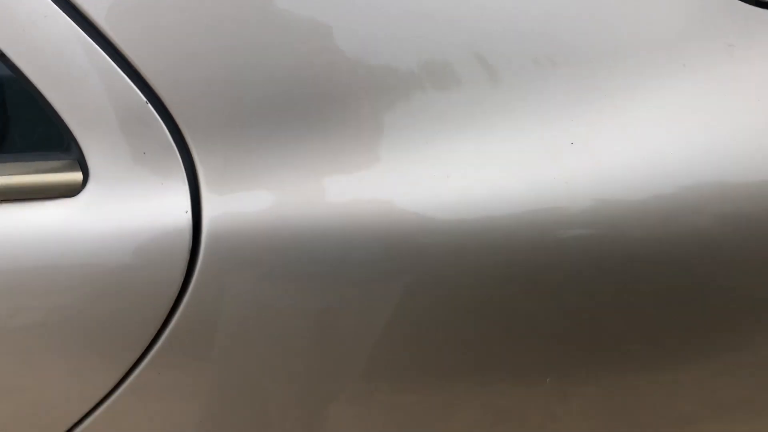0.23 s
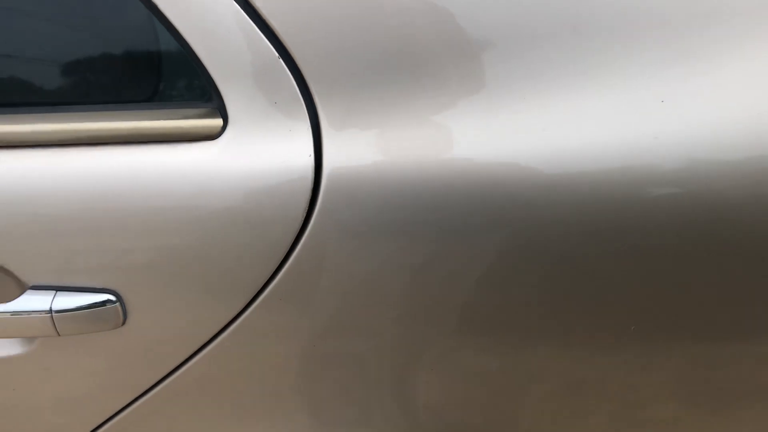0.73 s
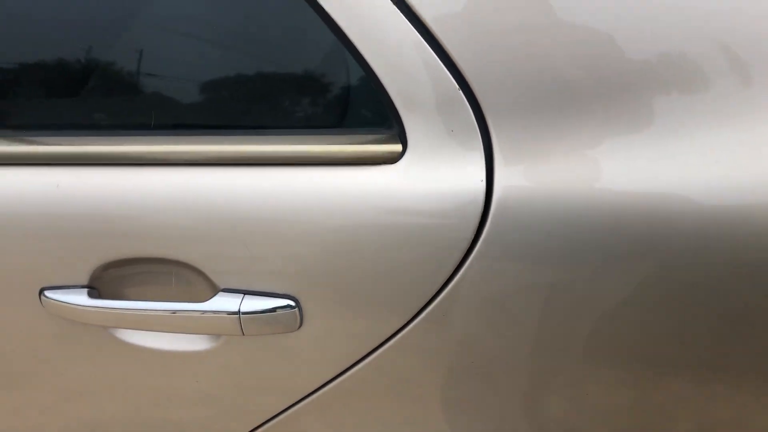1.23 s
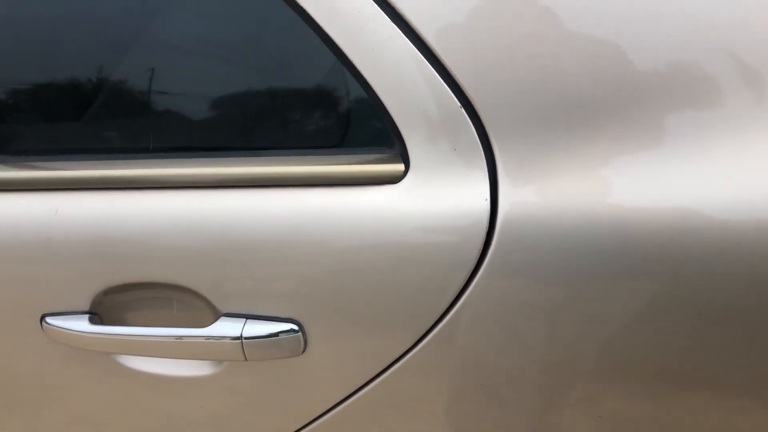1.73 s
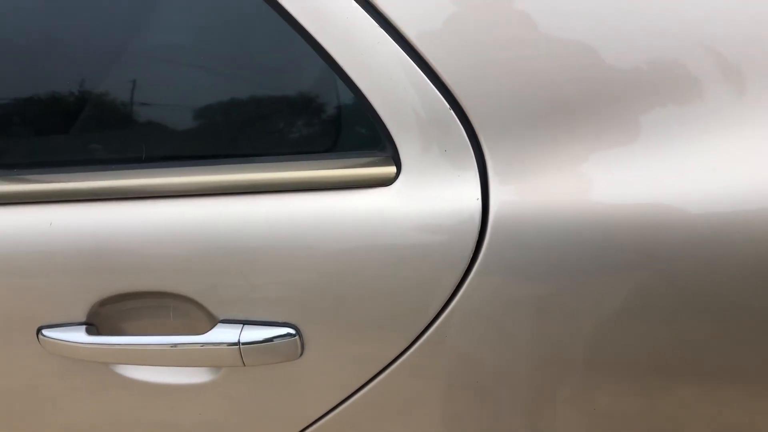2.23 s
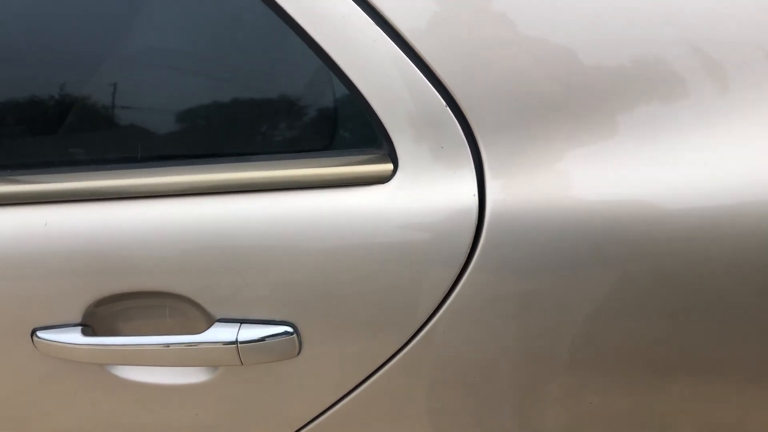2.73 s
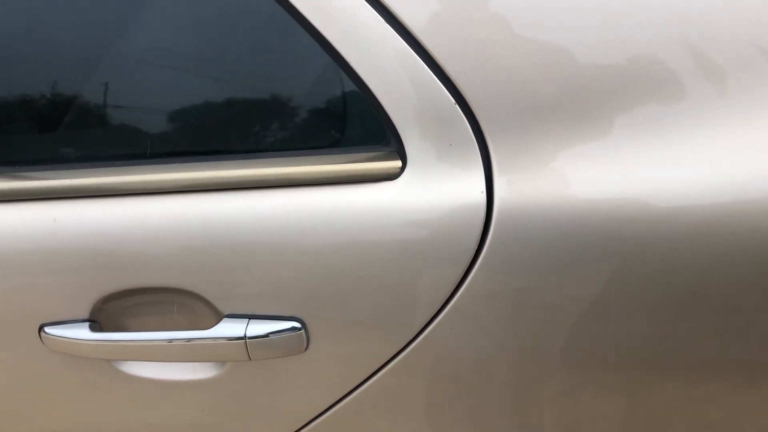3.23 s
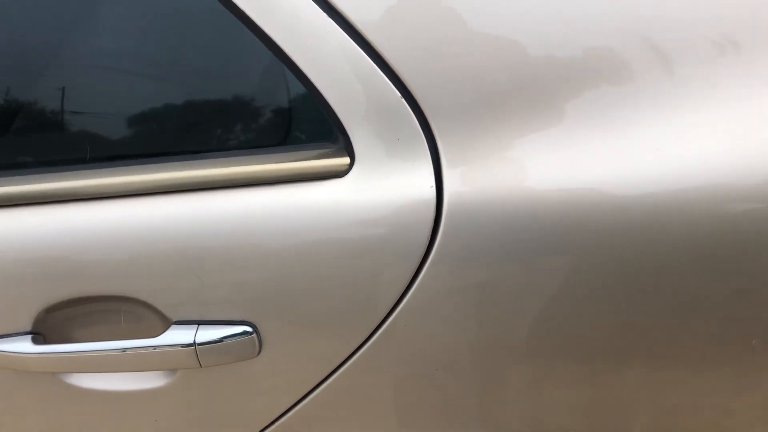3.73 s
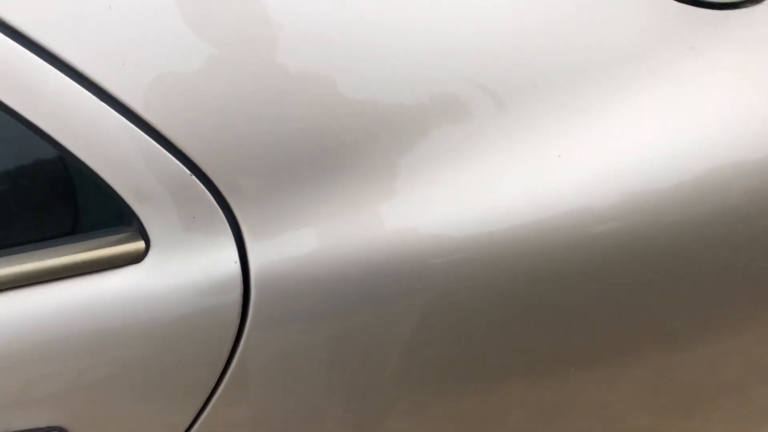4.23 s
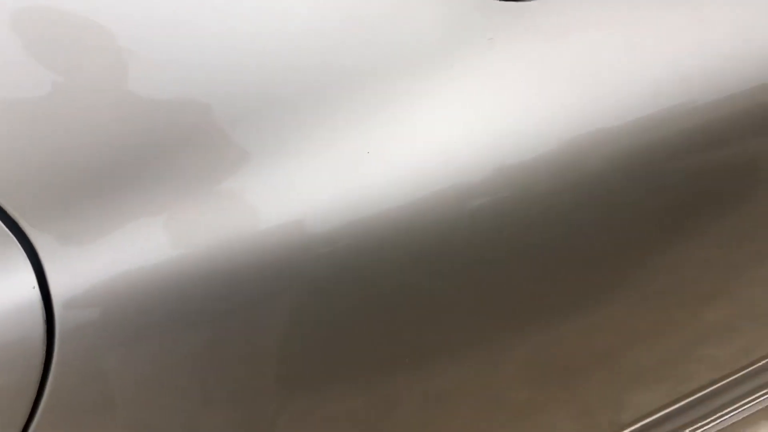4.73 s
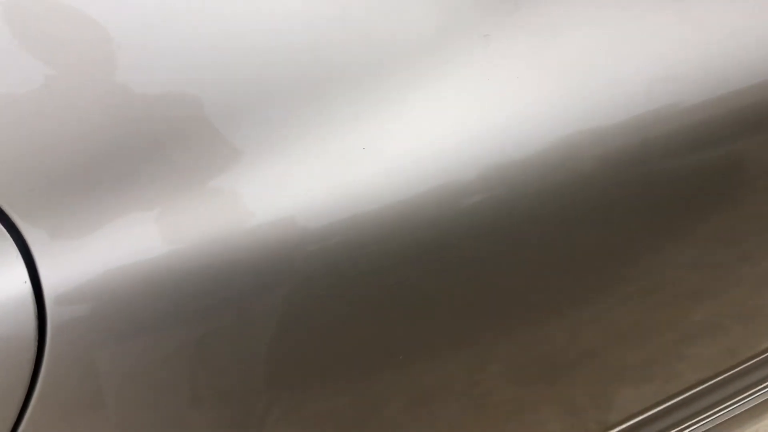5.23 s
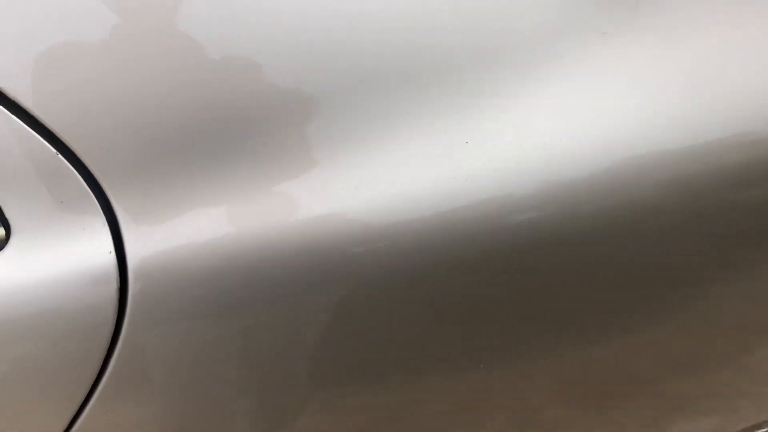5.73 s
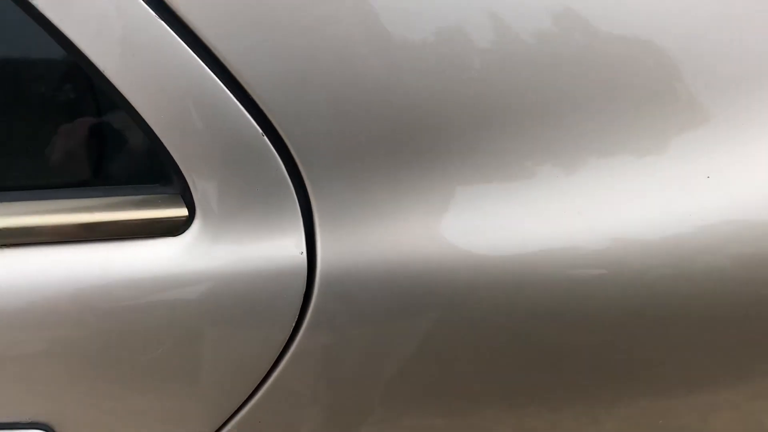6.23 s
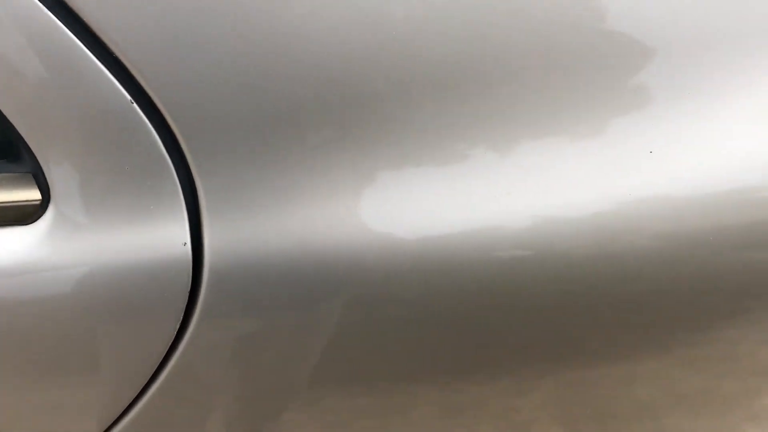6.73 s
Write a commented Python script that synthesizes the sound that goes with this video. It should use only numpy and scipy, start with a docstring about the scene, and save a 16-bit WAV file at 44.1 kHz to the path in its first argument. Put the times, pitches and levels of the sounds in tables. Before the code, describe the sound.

Outdoors, a thin jingle of keys and a rustle of fabric lead into uneven footwork on gravel, heard close up. Stones knock and scrape, and grit gives sharp little snaps. Late on comes a single dull thump on a car's body, the loudest sound. Low, faraway traffic lies underneath, with one passing vehicle's hum, very faint insects and one barely audible bird whistle.

```python
"""Beside a parked car, someone steps and shuffles on gritty ground, close to the microphone.
Stones grind, knock and scrape under the shoes, grit snaps, clothing brushes and keys jingle at the start.
Late on, a car panel takes one dull blow and rings briefly. Behind it all, distant traffic rumbles,
one vehicle hums past with falling pitch, insects hiss faintly and a far bird whistles once."""
import sys
import numpy as np
from scipy import signal
from scipy.fft import rfft, irfft, next_fast_len
from scipy.io import wavfile
from scipy.ndimage import map_coordinates

SR = 44100
rng = np.random.default_rng(int(sys.argv[2]) if len(sys.argv) > 2 else 0)


def to_wav(s):
    """Save 16-bit WAV."""
    ch = np.atleast_2d(s).T  # columns
    pcm = np.round(np.clip(ch, -1, 1) * 32767)  # PCM
    wavfile.write(sys.argv[1], SR, pcm.astype(np.int16))


N = 308259
TIME = np.arange(N) / SR


def amp(db):
    """Decibels to gain."""
    return 10 ** (np.asarray(db) / 20)


def unit(x):
    """Scale to rms 1."""
    return x / np.sqrt(np.mean(x ** 2) + 1e-20)


def curves(rows):
    """Automation: one value per sample for each column after the time."""
    times, *columns = np.transpose(rows)
    return [np.interp(TIME, times, column) for column in columns]


def swells(rows):
    """A gain envelope of bell-shaped strokes."""
    return sum(amp(db) * np.exp(-((TIME - middle) / half) ** 2) for middle, half, db in rows)


def wobble(rate):
    """Smooth random modulation, rate knots a second."""
    knots = rng.standard_normal(int(N * rate / SR) + 4)
    return map_coordinates(knots, [np.arange(N) * rate / SR])


def filtered(x, response):
    """Pass x through a complex frequency response."""
    size = next_fast_len(len(x) + 2048)
    return irfft(rfft(x, size) * response(np.fft.rfftfreq(size, 1 / SR)), size)[:len(x)]


def coloured(x, spectrum):
    """EQ x through (f/Hz, level/dB) points and scale it to rms 1."""
    hz, db = np.transpose(spectrum)
    return unit(filtered(x, lambda f: amp(np.interp(np.log(f + 1), np.log(hz), db))))


def resonance(f, hz, q):
    """Response of one damped mode."""
    return 1j * f * hz / q / (hz * hz - f * f + 1j * f * hz / q)


def highpass(f, hz):
    """Response of a second-order low cut."""
    return -f * f / (hz * hz - f * f + 1j * f * hz * np.sqrt(2))


def band_limit(f, top_hz=16200):
    """Response of a steep, smooth-edged high cut."""
    return 1 / np.sqrt(1 + (f / top_hz) ** 120)


def band(x, hz, q):
    """A narrow band of x, at rms 1."""
    return unit(filtered(x, lambda f: resonance(f, hz, q) ** 2))


def add(track, s, sound):
    """Mix a sound into the track at s seconds."""
    i = max(round(s * SR), 0)
    track[i:i + len(sound)] += sound[:N - i]


def ringing(modes, t, scatter_db):
    """Decaying modes, at slightly new strengths for every hit."""
    return sum(amp(db + scatter_db * rng.standard_normal() - 60 * t / t60) * np.sin(2 * np.pi * hz * t)
               for hz, db, t60 in modes)


def distant_tone(glide, partials, blur, blur_hz):
    """A gliding tone with (multiple, gain/dB) partials; scattered paths blur each into a narrow band."""
    hz, db = curves(glide)
    phase = 2 * np.pi * np.cumsum(hz) / SR
    gate = (TIME >= glide[0][0]) & (TIME <= glide[-1][0])
    out = np.zeros(N)
    for multiple, gain_db in partials:
        paths = 1 + blur * (wobble(blur_hz) + 1j * wobble(blur_hz))
        out += amp(db + gain_db) * np.imag(paths * np.exp(1j * multiple * phase))
    return gate * out


def traffic():
    """The bed: distant traffic rumble drifts in level under a steady hiss of air."""
    # outdoor noise colour: f/Hz, relative level/dB
    air_eq = [(20, -37), (35, -12.5), (55, -4), (90, 3), (150, -4), (250, -12), (500, -20.5), (1000, -26.5),
              (2000, -34), (5000, -38), (9000, -43.5), (10800, -45), (16000, -42.5)]
    # fader ride on the rumble: t/s, level/dB
    rumble_ride = [(0, -55), (2.3, -55), (4.2, -56), (5.3, -58), (5.75, -55), (7, -57.5)]
    air = coloured(rng.standard_normal(N), air_eq)
    rumble = filtered(air, lambda f: 1 / (1 + (f / 900) ** 2))
    hiss = air - rumble
    return amp(curves(rumble_ride)[0]) * rumble + amp(-56.5) * hiss


def insects():
    """Far insects merge into two high bands: a thin, steady one and a wider one that swells late."""
    # the late swell: middle t/s, half-length/s, level/dB
    shrills = [(6.92, 0.29, -77)]
    steady = amp(-87) * band(rng.standard_normal(N), hz=9900, q=11)
    return steady + swells(shrills) * band(rng.standard_normal(N), hz=8350, q=2.5)


def bird():
    """One far whistle lifts and falls, blurred on its way."""
    # the whistle: t/s, f/Hz, level/dB
    glide = [(3.14, 3000, -98), (3.24, 3160, -82), (3.36, 2880, -81.5), (3.6, 2790, -79)]
    return distant_tone(glide, [(1, 0)], blur=0.99, blur_hz=216)


def vehicle():
    """A vehicle's hum falls in pitch as it passes."""
    # the hum: t/s, f/Hz, level/dB before the partials' gains
    glide = [(5.4, 242.2, -90), (5.68, 238, -65), (5.95, 231, -58.5), (6.15, 221.2, -61.5),
             (6.3, 209.3, -57), (6.5, 198.4, -60), (6.7, 189, -59.5), (7, 181, -63.5)]
    return distant_tone(glide, [(1, 4), (2, -16.0)], blur=0.31, blur_hz=29.4)


def clothing():
    """Fabric slides over fabric in soft, slightly scratchy swells."""
    # sweeps of clothing: middle t/s, half-length/s, level/dB
    brushes = [(.03, 0.094, -53), (.49, 0.23, -53), (1.08, .15, -52.5), (4.35, 0.3, -66.5)]
    # fabric colour: f/Hz, relative level/dB
    cloth_eq = [(250, -4), (500, -1.5), (850, 4.5), (1500, 3), (3000, 2), (6000, -3), (12000, -9),
                (16000, -9.5)]
    scratch = amp(1.54 * wobble(66) + 1.3 * wobble(700))
    return swells(brushes) * scratch * coloured(rng.standard_normal(N), cloth_eq)


def keys():
    """Small metal, like keys, gives a brief, thin jingle; every touch favours other modes."""
    # touches: t/s, level/dB
    jingles = [(.032, -53), (0.066, -50), (0.102, -40), (.117, -44), (.135, -55)]
    # modes of the metal: f/Hz, relative level/dB, t60/s
    modes = [(2880, -10, 0.074), (4650, -18.5, 0.1), (6230, -12, 0.036), (9460, 2.5, 0.044),
             (12500, -7, 0.066)]
    out, t = np.zeros(N), np.arange(SR // 2) / SR
    for s, db in jingles:
        add(out, s, amp(db) * ringing(modes, t, scatter_db=1.5))
    return out * amp(1.5 * wobble(245))


def panel():
    """Soft rubs and a cushioned blow on the car: high modes speak first, heavy low ones build later."""
    # the blow: t/s, level/dB
    blows = [(6.0185, -25.5)]
    # modes of the panel and the cavity behind it: f/Hz, relative level/dB, t60/s
    modes = [(120.3, -3.5, 0.17), (259.3, 4, 0.13), (319.5, -5.5, 0.17), (376, -14, 0.21), (443, -13, 0.21),
             (497, -7.5, 0.16), (632, -20.5, 0.24), (748, -16, .13), (820, -14, 0.17), (920, -23, 0.16),
             (1072, -1.5, 0.044), (1210, -15, 0.084), (1960, -6.5, 0.042), (2140, -10, 0.034)]
    # colour of the blow's rattle: f/Hz, relative level/dB
    thud_eq = [(50, -33), (100, 0.5), (300, -17), (520, -8), (1100, -11), (1400, -16), (2100, -18.5),
               (4000, -25), (16000, -36.5)]
    # rubs around the blow: middle t/s, half-length/s, level/dB
    rubs = [(5.71, 0.083, -58.5), (5.825, 0.016, -51), (5.9, 0.023, -47.5), (6.09, 0.21, -59)]
    # colour of the rubs: f/Hz, relative level/dB
    rub_eq = [(100, 3), (250, 4), (550, -3.5), (900, -10), (1600, -12.5), (4000, -38)]
    out, t = np.zeros(N), np.arange(SR // 2) / SR
    for s, db in blows:
        ring = np.zeros(len(t))
        for k, mode in enumerate(modes):
            attack = 1 - np.exp(-(t * mode[0] / 1.76) ** 2)  # opens over about two cycles
            ring += (-1) ** k * ringing([mode], t, scatter_db=0.5) * attack
        burst = amp(-60 * t / 0.19) * (1 - np.exp(-t / 0.0016))
        rattle = coloured(rng.standard_normal(len(t)), thud_eq) * burst
        add(out, s, amp(db) * ring)
        add(out, s - 0.002, amp(db - 6.5) * rattle)
    return out + swells(rubs) * coloured(rng.standard_normal(N), rub_eq)


def scrapes():
    """A dragged pebble judders and rings at its own pitch for a moment."""
    # drags: middle t/s, level/dB, f/Hz
    drags = [(.875, -47, 4430), (1.762, -51.5, 3940), (2.359, -59, 4250), (3.68, -55.5, 4250)]
    judder = unit(rng.standard_normal(N) * amp(9.2 * wobble(200)))
    return sum(swells([(s, 0.033, db)]) * band(judder, hz, q=5) for s, db, hz in drags)


def contact(body_db, hz, crack_db, chatter_t60, chatter, q, broad, broad_hz, low_cut_hz):
    """A spike and a chatter of micro-slips ring a stone and give off a bright crack, mixed half each."""
    t = np.arange(SR // 25) / SR
    force = chatter * rng.standard_normal(len(t)) * rng.exponential(size=len(t))
    force *= amp(-60 * t / chatter_t60)
    force[0] += 1
    overtone_hz = hz * rng.uniform(1.3, 1.6)
    modes = lambda f: resonance(f, hz, q) + 0.11 * resonance(f, overtone_hz, q)
    stone = lambda f: modes(f) + broad * resonance(f, broad_hz, 0.53)
    # small things radiate little bass
    body = filtered(force, lambda f: stone(f) * highpass(f, low_cut_hz) * resonance(f, 2500, 0.61))
    crack = filtered(force, lambda f: highpass(f, 5700) ** 2 * resonance(f, 9500, 0.85) * band_limit(f))
    return (amp(body_db) * unit(body) + amp(crack_db) * unit(crack)) / 2


def snaps():
    """A faint tick leads into each sharp snap of grit."""
    # dry snaps: t/s, body drive/dB, f/Hz, crack drive/dB
    breaks = [(1.4247, -51, 2270, -72), (2.5032, -62.5, 2310, -70), (2.7638, -58.5, 1410, -85),
              (2.8591, -43.5, 2190, -49.5), (3.096, -43.5, 2280, -44.5), (3.275, -63.5, 1460, -85),
              (3.3212, -48.5, 3080, -52.5), (3.5252, -46.5, 2330, -50), (4.3641, -44, 1800, -40.5),
              (4.8225, -37.5, 5200, -35), (5.0495, -41, 5400, -43.5), (5.2237, -35.5, 4900, -30.5),
              (5.296, -43.5, 4800, -40.5), (5.4457, -50.5, 4350, -57)]
    lead_s, lead_gain_db = 0.011, -22.5
    out = np.zeros(N)
    for s, body_db, hz, crack_db in breaks:
        snap = contact(body_db, hz, crack_db, chatter_t60=0.004, chatter=0.14,
                       q=4.5, broad=0.47, broad_hz=2050, low_cut_hz=880)
        lead_tick = contact(body_db, 2860, crack_db - 9, chatter_t60=0.046, chatter=0.35,
                            q=5, broad=0.3, broad_hz=3200, low_cut_hz=1500)
        add(out, s, snap)
        add(out, s - lead_s, amp(lead_gain_db) * lead_tick)
    return out


def stones():
    """Pebbles slip and knock against each other, each with its own pitch."""
    # the loudest knocks: t/s, body drive/dB, f/Hz, crack drive/dB, chatter t60/s
    knocks = [(0.0268, -43.5, 2770, -48, 0.043), (0.049, -35.5, 2800, -34, 0.038),
              (0.2854, -42.5, 4550, -44, .024), (0.309, -46, 2340, -50.5, 0.041),
              (0.3618, -46, 5900, -46.5, 0.05), (0.8692, -41.5, 4600, -49, 0.0069),
              (0.9382, -46, 3120, -62, 0.01), (0.96, -45.5, 3130, -43.5, 0.029),
              (1.1366, -43.5, 3450, -39.5, 0.034), (1.2182, -43, 4530, -41.5, 0.031),
              (1.2969, -43, 4300, -37, 0.084), (1.337, -46, 3770, -37.5, 0.0059),
              (1.36, -42, 4070, -41, 0.021), (1.4, -46, 2830, -59, 0.036), (1.502, -55, 4270, -61, .008),
              (1.52, -39.5, 2740, -42, 0.016), (1.5552, -46.5, 2370, -50.5, 0.031),
              (1.5729, -33.5, 3840, -40, 0.022), (1.7467, -51.5, 4240, -68, 0.007),
              (1.8674, -42, 3100, -52, 0.0069), (1.8816, -32, 2340, -38, 0.0033),
              (1.9815, -53, 3420, -61, 0.0067), (2.0255, -57.5, 2800, -64, 0.0098),
              (2.098, -56, 4500, -52, 0.015), (2.1288, -29.5, 4160, -38.5, 0.0073),
              (2.167, -36.5, 2760, -42, 0.024), (2.998, -57.5, 2640, -77, 0.018),
              (3.4704, -49, 2700, -54.5, 0.023), (3.5643, -48.5, 2700, -49.5, 0.0096),
              (3.6403, -44.5, 2500, -47.5, 0.0025), (3.917, -49, 5760, -53, 0.015),
              (4.0883, -56.5, 2090, -59.5, 0.023), (4.1214, -54.5, 2520, -51.5, 0.0029),
              (4.4894, -54.5, 4840, -50.5, 0.005), (4.532, -52.5, 5160, -56.5, 0.0076),
              (4.5621, -53, 2290, -57.5, 0.0068), (4.883, -53.5, 6050, -54.5, 0.0056),
              (5.359, -62, 4800, -64, 0.0098), (5.6285, -46.5, 5500, -49, .002),
              (5.6382, -41, 4360, -50, 0.0076), (5.661, -47, 6000, -44, .027),
              (5.6992, -51, 3600, -58, .009), (5.7867, -50.5, 2830, -52, 0.0014),
              (5.8995, -50, 2760, -64, .005), (5.9148, -40, 2700, -46, 0.017),
              (5.942, -43.5, 3180, -45, .002), (5.9615, -42.5, 6100, -40, 0.02),
              (6.1035, -55, 5350, -48.5, 0.0064), (6.129, -46.5, 2526, -48, .012),
              (6.1589, -42, 2720, -48, .005), (6.172, -47, 3800, -55, 0.0032),
              (6.26, -54, 5150, -53.5, 0.0037), (6.39, -62, 5500, -62, 0.0058),
              (6.5116, -53, 2470, -55.5, 0.11), (6.8372, -60.5, 3750, -64, 0.0018)]
    out = np.zeros(N)
    for s, body_db, hz, crack_db, chatter_t60 in knocks:
        knock = contact(body_db, hz, crack_db, chatter_t60, chatter=0.35,
                        q=9.8, broad=0.26, broad_hz=3220, low_cut_hz=1670)
        add(out, s, knock)
    return out


def weight(start, hold, press_s=0.007, lift_s=0.017):
    """A shoe's load builds up before the start, holds, then dies away as it lifts."""
    t = TIME - start
    return np.exp(np.minimum(t, 0) / press_s - np.maximum(t - hold, 0) / lift_s)


def grains(share, rate, spread_db, centre_hz, octaves, ring_cycles):
    """Tiny uneven fractures: their bare impulses, and the short rings of the stones they strike."""
    count = int(rate * N / SR)
    when, pitch, size, luck = rng.random((count, 4)).T
    onset = (when * N).astype(int)
    age = np.arange(256)
    cycles = centre_hz * 2 ** (octaves * (pitch[:, None] - 0.5)) * age / SR
    breaks = (luck < share[onset]) / np.sqrt(share[onset])  # fewer fractures share the same energy
    strength = breaks * amp(spread_db * size ** 4) * (-1) ** np.arange(count)
    rings = strength[:, None] * np.sin(2 * np.pi * cycles) * amp(-60 * cycles / ring_cycles)
    ring_track = np.bincount((onset[:, None] + age).ravel(), rings.ravel())[:N]
    return np.bincount(onset, strength, N), ring_track


def crunch():
    """The sole grinds stones and crushes sand: dense under full weight, sparser ticks under less."""
    # a shoe presses or twists: start t/s, hold/s, grind level/dB, sand level/dB
    shuffles = [(0.018, 0.14, -59.5, -56.5), (0.665, 0.17, -66.5, -64.5), (0.846, 0.09, -49.5, -51.5),
                (1.099, 0.078, -54, -52), (1.265, 0.025, -54, -51.5), (1.296, 0.054, -46, -48),
                (1.507, 0.077, -50, -64), (1.663, .13, -58.5, -66), (1.864, 0.024, -51, -56),
                (1.938, 0.054, -60.5, -67), (2.111, 0.089, -47, -45.5), (2.203, 0.045, -53.5, -58),
                (2.303, 0.064, -62, -61), (2.888, 0.044, -59.5, -73.5), (3.03, 0.15, -72, -73.5),
                (3.604, 0.091, -54, -55.5), (3.785, 0.018, -57, -58), (3.914, 0.023, -55, -55.5),
                (3.96, 0.069, -77, -69.5), (4.308, 0.075, -61.5, -62.5), (4.538, 0.019, -66, -60),
                (4.772, 0.0071, -68, -55), (5.034, 0.033, -61.5, -68), (5.164, 0.027, -66.5, -66.5),
                (5.245, 0.034, -60, -66), (5.64, 0.038, -54, -60.5), (5.934, 0.04, -53, -59),
                (6.075, 0.19, -55, -59.5)]
    # colour of grinding stones: f/Hz, relative level/dB
    grind_eq = [(400, -16.5), (1000, -7.5), (1750, -11), (2500, 2.5), (3400, 0.5), (4400, -1.5),
                (6200, -13), (8000, -25.5), (16000, -25.5)]
    # colour of crushed sand: f/Hz, relative level/dB
    sand_eq = [(2500, -3), (5000, 8), (7000, 4.5), (10000, 9.5), (13000, 4), (16000, -0.5)]
    grind_gain, sand_gain = amp(-81.5), amp(-83.5)  # grit ticks even under a resting foot
    for start, hold, grind_db, sand_db in shuffles:
        load = weight(start, hold)
        grind_gain = np.maximum(grind_gain, amp(grind_db) * load)
        sand_gain = np.maximum(sand_gain, amp(sand_db) * load)
    full_weight_db, lightest_share = -46, 0.11
    share = np.clip(grind_gain / amp(full_weight_db), lightest_share, 1)  # of the grains that break
    stick_slip = unit(amp(4.5 * wobble(130)))  # the sole catches and lets go unevenly
    cracks, rings = grains(share, rate=1800, spread_db=14.5, centre_hz=3566, octaves=1.53, ring_cycles=32)
    _, specks = grains(share, rate=3000, spread_db=13.5, centre_hz=8230, octaves=1.9, ring_cycles=35)
    grind = unit(rings) + 1.17 * unit(cracks)  # bare fractures reach far below the stones' pitch
    hiss = rng.standard_normal(N)  # the finest grains merge
    sand = 0.73 * unit(cracks) + 0.76 * unit(specks) + 0.18 * hiss
    return stick_slip * (grind_gain * coloured(grind, grind_eq) + sand_gain * coloured(sand, sand_eq))


def reflections(x):
    """The car's side and the ground answer within milliseconds; the yard adds a faint, darker tail."""
    t = np.arange(SR // 3) / SR
    early = rng.standard_normal(len(t)) * amp(-60 * t / 0.023) * (t > 0.002)
    tail = rng.standard_normal(len(t)) * amp(-60 * t / 0.23) * (t > 0.008)
    dark_tail = filtered(tail / np.linalg.norm(tail), lambda f: 1 / (1 + 1j * f / 5000))
    response = amp(-12.5) * early / np.linalg.norm(early) + amp(-27) * dark_tail
    return signal.fftconvolve(x, response)[:N]


def scene():
    """Footwork, keys and panel with their reflections, plus dry clothing, over the outdoor bed in mono."""
    near = stones() + snaps() + crunch() + scrapes() + keys() + panel()
    foreground = near + reflections(near) + clothing()
    background = traffic() + vehicle() + bird() + insects()
    return (foreground + background)[None]


def record(dry):
    """The small microphone loses the deepest bass, and the recorder cuts the very top."""
    response = lambda f: abs(highpass(f, 36.5)) ** 2 * band_limit(f)
    return np.array([filtered(channel, response) for channel in dry])


dry = scene()
out = record(dry)
to_wav(out)
```